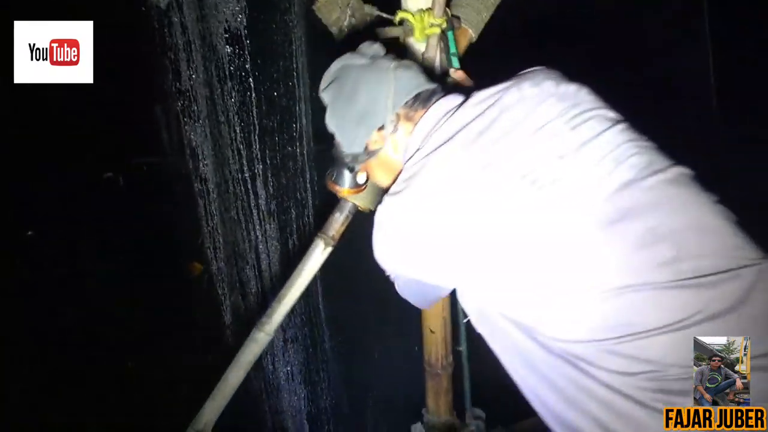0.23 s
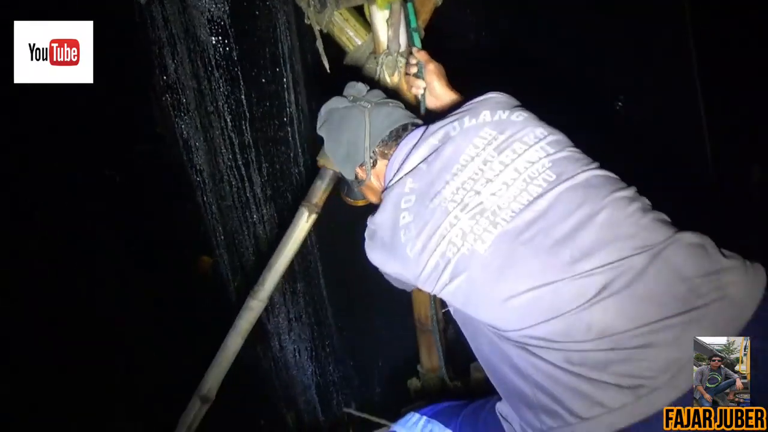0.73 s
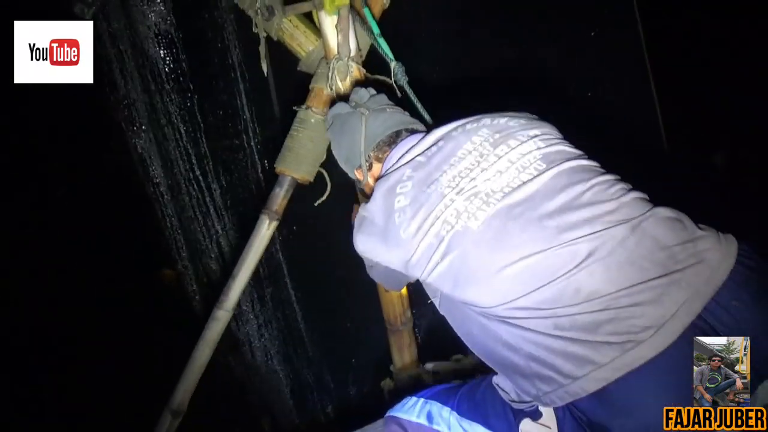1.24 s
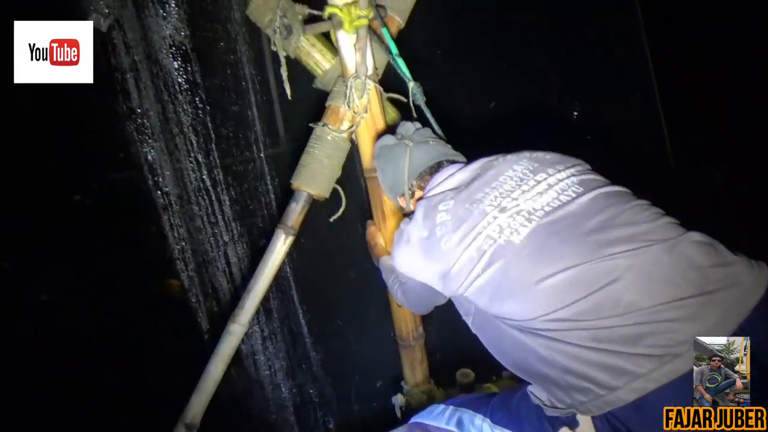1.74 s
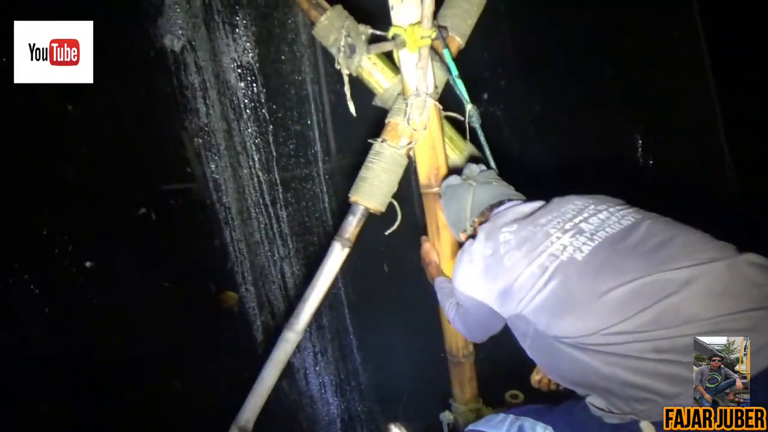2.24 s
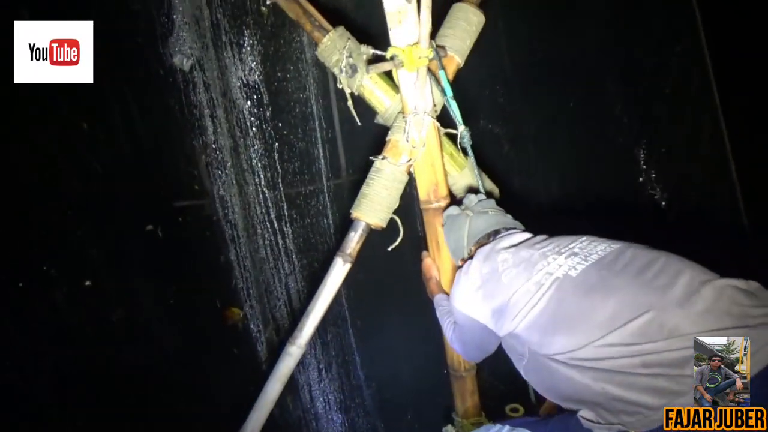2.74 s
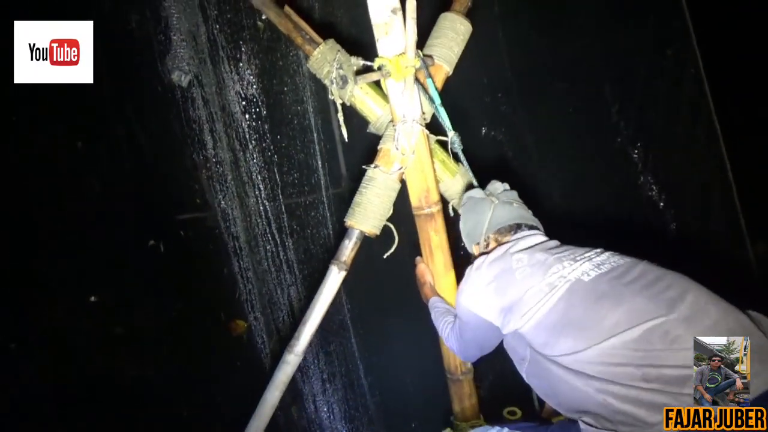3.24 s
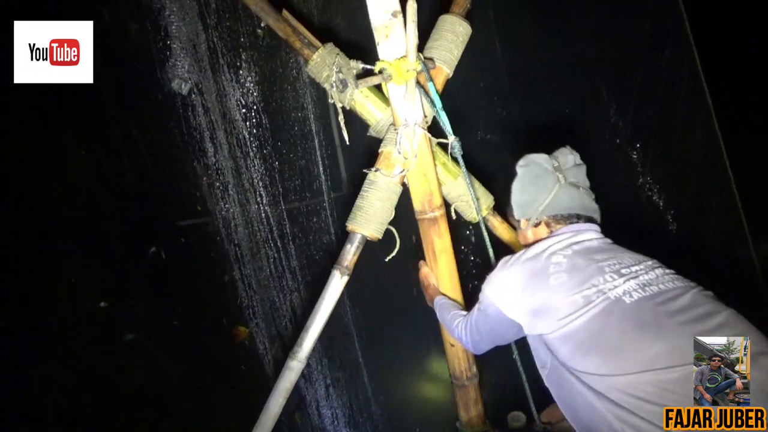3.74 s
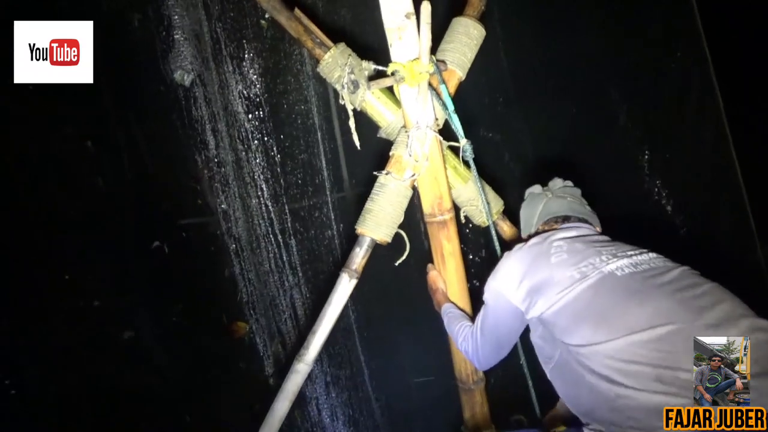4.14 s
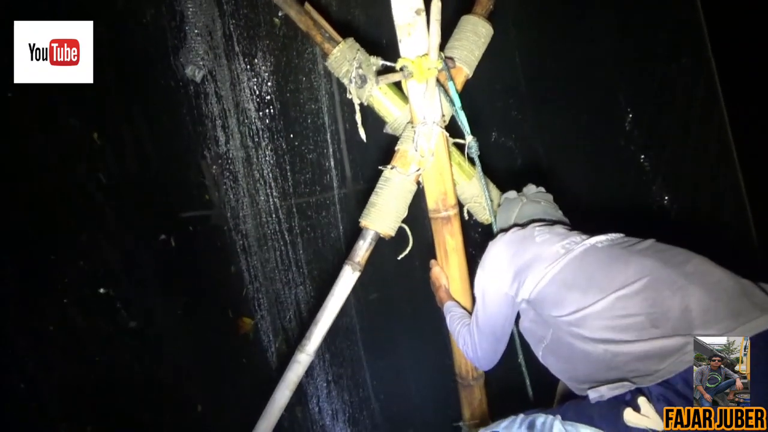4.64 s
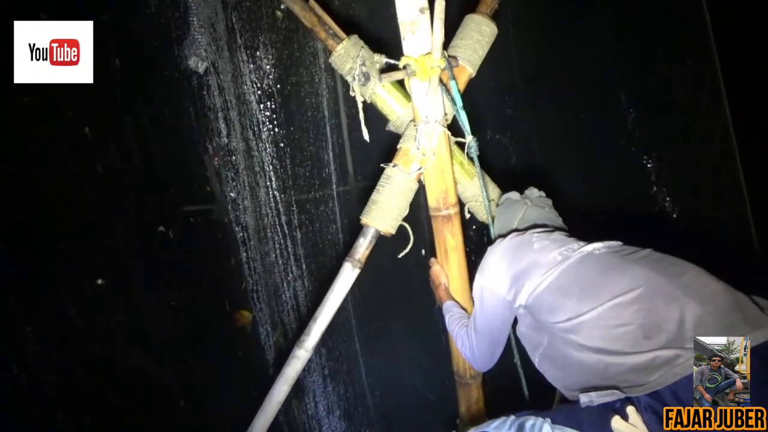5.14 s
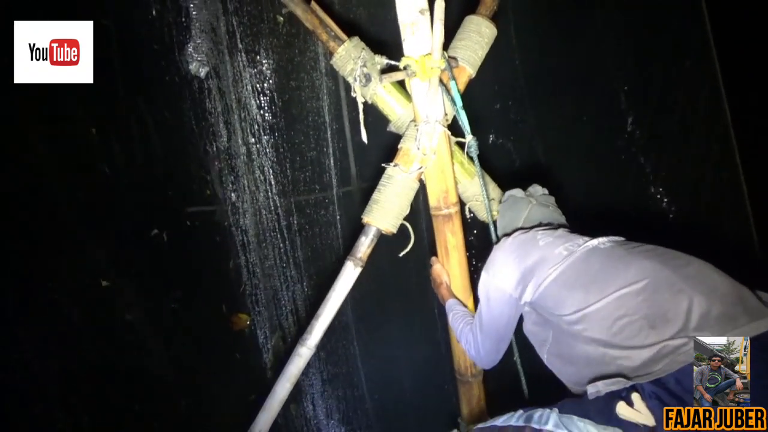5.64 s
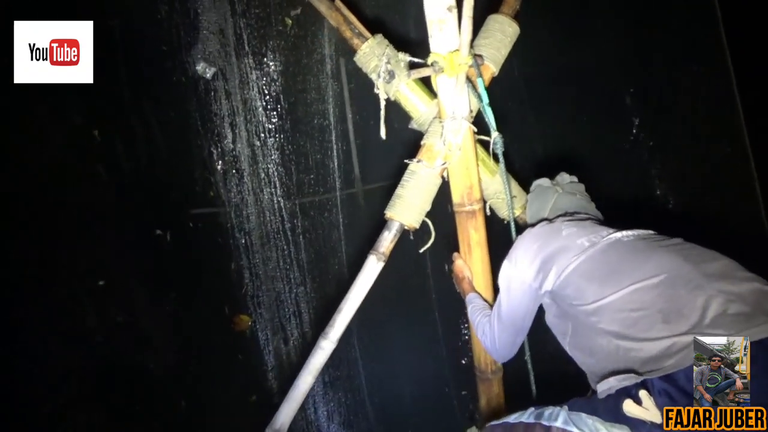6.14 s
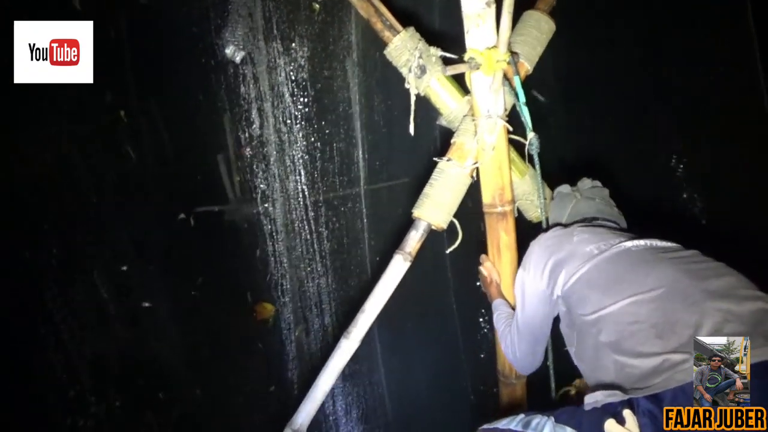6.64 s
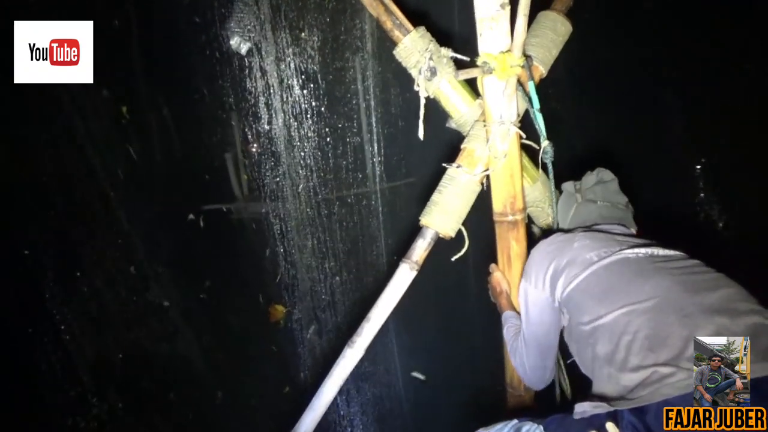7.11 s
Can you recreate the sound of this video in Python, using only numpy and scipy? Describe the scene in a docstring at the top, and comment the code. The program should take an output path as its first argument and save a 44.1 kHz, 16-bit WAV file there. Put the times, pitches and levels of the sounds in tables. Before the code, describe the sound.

Sharp drips, small plops and a few bamboo knocks sound over softly running river water and a faint, pulsing cricket.

```python
"""Lift net on a night river

Water rumbles, hushes and laps; a cricket rasps its wings near 5 kHz among far crickets and insects.
A wet net hangs from a bamboo frame: cloth and rope hiss by friction, knocks ring the modes of the poles,
and drops tick on the frame or plop into the river, where their bubbles resonate. The banks echo it all.
A mono sound is widened to pseudo-stereo: left and right channels alike in level, shifted in phase."""
import sys
import numpy as np
from scipy import signal
from scipy.fft import rfft, irfft, next_fast_len
from scipy.io import wavfile
from scipy.ndimage import uniform_filter1d, map_coordinates

SR = 44100
rng = np.random.default_rng(int(sys.argv[2]) if len(sys.argv) > 2 else 0)


def transcribe(signal):
    """Save signal, clipped to [-1, 1], as a 16-bit WAV file at the path in sys.argv[1]."""
    frames = np.atleast_2d(signal).T
    limited = np.clip(frames, -1, 1)
    pcm = np.round(limited * 32767).astype(np.int16)
    wavfile.write(sys.argv[1], SR, pcm)


N = 325149

# river rumble and ripples of water running off the net: (time [s], rumble level [dB], ripple level [dB])
WATER_LEVELS = [(0.0, -52, -44.5), (0.49, -52, -47), (1.05, -38.5, -51.5), (1.37, -52, -55),
                (1.82, -50.5, -55.5), (2.4, -54.5, -55), (3.2, -53.5, -57), (3.3, -53, -56.5),
                (6.3, -51, -58), (6.8, -43, -54.5), (7.1, -53, -53), (7.37, -54, -57.5)]
# noise spectra: (frequency [Hz], relative density [dB])
RUMBLE_SPECTRUM = [(12, -20), (25, 0), (40, -9), (59, 4.5), (97, -6), (200, -15), (260, -51)]
HUSH_SPECTRUM = [(71, -24), (120, -4), (225, -6.5), (308, -3.5), (470, -8.5), (844, -8.5), (1600, -17.5),
                 (2080, -21), (3520, -120)]
RIPPLE_SPECTRUM = [(900, -24), (1500, -5), (2600, -3), (4000, -6.5), (5000, -8), (6000, -33.5)]
TRICKLE_SPECTRUM = [(4000, -63), (5000, 1), (6500, -1.5), (9500, 2.5), (11000, -3.5), (13000, -8),
                    (16000, -12.5), (17000, -2)]
CLOTH_SPECTRUM = [(5000, -40), (7200, -38), (8300, -5), (9200, -6), (10000, -9), (11200, 1), (12800, -9),
                  (15000, -33)]
# share of the water noise that differs between the channels: (frequency [Hz], relative level [dB])
CHANNEL_DIFFERENCE = [(60, -28), (300, -7.5), (1500, -0.5), (5000, -10.5), (12000, -24.5)]
# pseudo-stereo all-pass filter, left channel minus right: (frequency [Hz], phase [rad])
ALLPASS_PHASE = [(30, .15), (70, 0.2), (140, 0.38), (300, 0.59), (700, 1), (1400, 1.6), (2400, 0.98),
                 (3500, 1.05), (5500, 0.38), (9000, 0.55), (12000, 0.071)]
# far insect choruses: (centre [Hz], half-width [Hz], level [dB], swell rate [1/s])
INSECT_BANDS = [(7940, 150, -67.5, 14), (5380, 300, -63, 20)]
# near cricket's phrases, single strokes then pairs: (start [s], first pair [s], pair period [s])
CRICKET_PHRASES = [(-.033, -.033, .1405), (.446, .619, .137), (1.683, 1.799, .1434), (2.772, 2.889, .1402),
                   (3.971, 4.146, .1386), (5.182, 5.361, .1407), (6.447, 6.76, .14)]
# strength of the near cricket: (time [s], level [dB])
CRICKET_LEVELS = [(0, -41), (.27, -46), (.38, -41), (.6, -41.5), (.9, -48), (1.5, -47), (2.1, -47),
                  (2.4, -51), (2.9, -45.5), (4.2, -47.5), (4.7, -53), (5.2, -50.5), (5.6, -51), (6.2, -48),
                  (7.37, -47)]
# rope slipping on bamboo: (time [s], duration [s], level [dB], centre [Hz], half-width [Hz])
ROPE_SLIPS = [(0, 0.058, -39.5, 8640, 3520), (0.239, 0.019, -41.5, 8540, 3500),
              (0.259, 0.034, -36, 6450, 5530), (0.254, 0.11, -35, 500, 950),
              (0.461, 0.025, -37, 7950, 4000), (2.119, 0.047, -42, 7700, 3420),
              (2.53, 0.084, -46, 9400, 2400), (2.889, 0.046, -48, 9300, 2400),
              (4.776, 0.031, -45, 6700, 5500), (5.012, 0.029, -33.5, 7900, 3770),
              (5.033, 0.017, -16.5, 8700, 2830), (5.031, 0.025, -25, 7340, 7350),
              (6.216, 0.04, -46.5, 7400, 4500), (6.65, 0.016, -42.5, 7200, 3040),
              (7.086, 0.023, -39.5, 7050, 4000)]
# modes of the poles: (frequency [Hz], relative level [dB], t60 at damping factor 1 [s])
BAMBOO_MODES = [(334, -1, 0.11), (419.8, -1.5, 0.11), (663.4, -8, 0.12), (843, 3, 0.042), (1017, -7, 0.089),
                (1214, -3, 0.064), (1472, -13.5, 0.13), (1900, -8, 0.12), (2070, -5, 0.045),
                (3750, -6, 0.013), (4540, 0, 0.038)]
# knocks of the poles: (time [s], level [dB], pitch [Hz], damping factor [1])
POLE_KNOCKS = [(.09, -24, 900, 1.8), (.258, -20.5, 776, 0.42), (.413, -18, 1390, 1.1),
               (.468, -5, 950, 0.97), (1.649, -19.5, 736, 2.4), (1.732, -26, 660, 0.81),
               (1.81, -26.5, 400, 5.3), (2.65, -21.5, 550, 0.75), (2.723, -21.5, 760, 0.74),
               (3.842, -35.5, 900, 0.66), (4.177, -33, 513, 1.7), (5.04, -18.5, 794, 3.5),
               (5.817, -37, 600, 1.1), (6.224, -26, 1700, 0.71), (6.515, -25, 1100, 1.16),
               (7.09, -16, 820, 0.72)]
# dull bumps through the frame: (time [s], relative level [dB], frequency [Hz])
FRAME_THUDS = [(.26, -21, 287), (.283, -18, 160), (0.298, -27, 120), (0.721, -26.5, 103),
               (1.225, -24.5, 71), (5.067, -18, 325), (5.072, -24.5, 252), (7.09, -18, 282)]
# drops into the water: (time [s], level [dB], splat centre [Hz], t60 [s])
DROP_PLOPS = [(.315, -30, 3300, 0.0097), (.6127, -29.5, 1780, 0.031), (1.355, -40, 840, .043),
              (1.421, -33.5, 1590, 0.037), (1.4553, -32, 1550, 0.025), (1.8442, -33.5, 2740, 0.01),
              (1.9102, -38, 2940, 0.028), (1.951, -39, 1176, 0.11), (2.0313, -33, 1715, 0.062),
              (2.0672, -33, 2270, 0.019), (2.305, -39.5, 2100, 0.023), (2.45, -32.5, 2360, 0.014),
              (2.496, -37, 1500, 0.031), (2.6125, -30.5, 3630, .015), (2.6299, -27.5, 3690, 0.023),
              (2.973, -38, 400, .05), (4.268, -43, 394, 0.028), (4.425, -35, 1290, 0.019),
              (4.7, -34, 810, 0.024), (5.563, -40.5, 603, 0.028), (5.988, -38, 740, .024),
              (6.577, -36, 2460, 0.01), (6.6757, -37, 3700, .015), (6.989, -41, 3360, .02)]
# drops on frame and net: (time [s], level [dB], ring frequency [Hz], t60 [s], relative body level [dB])
DROP_TICKS = [(0.0706, -31, 9600, .008, -25), (.181, -42, 8150, .006, -22), (0.2486, -23, 8200, .006, -23),
              (0.274, -27, 9250, 0.011, 3.5), (.384, -28, 9400, .006, -25), (0.405, -31, 5470, 0.0074, -6),
              (0.4125, -22, 7140, 0.0054, 5.5), (0.4687, -22, 8440, 0.0067, 10.5),
              (0.6248, -11, 9000, 0.0036, -39), (.7256, -33, 9100, .006, -14),
              (.8283, -30, 9200, .006, -62), (1.2133, -31, 7620, .009, -1), (1.736, -33, 9800, .006, -22),
              (1.9804, -37.5, 10600, 0.016, -26), (2.012, -35.5, 9100, .006, -11),
              (2.143, -26, 8340, 0.0065, -8), (2.2684, -34, 8930, .0055, -11),
              (2.3984, -7, 9320, 0.01, -20), (2.5238, -35, 9600, .005, -4),
              (2.6178, -25, 8650, 0.0091, -16), (2.63, -28.5, 8400, 0.0088, -7),
              (2.9504, -37.5, 9700, .006, 2), (3.0485, -27, 10140, 0.009, -12),
              (3.4212, -28, 7800, 0.0043, -7), (3.4526, -31.5, 7450, 0.0081, -14),
              (3.59, -43, 8350, 0.008, 5), (4.426, -35, 8300, 0.0084, 1), (4.7757, -33, 6110, .0045, -9),
              (4.786, -32.5, 10200, 0.01, -5.5), (4.8256, -36.5, 6200, .006, -25),
              (5.1296, -16.5, 9260, 0.003, -5.5), (6.114, -43, 8600, .006, -15),
              (6.2239, -29, 8300, .006, -1), (6.516, -30.5, 8500, 0.0053, 4),
              (6.8915, -33, 9000, 0.0045, -2), (7.0903, -30, 8100, .0055, -8), (7.2, -36, 9650, .0055, -4),
              (7.236, -25.5, 9200, 0.0032, -27)]


def amp(db):
    """Amplitude ratio of a level in decibels."""
    return 10 ** (np.asarray(db) / 20)


def unit(x):
    """Normalisation to an rms of 1."""
    return x / np.sqrt(np.mean(x ** 2) + 1e-20)


def along(points, hz):
    """Interpolation of (frequency, value) points on a logarithmic frequency axis."""
    freqs, values = np.transpose(points)
    return np.interp(np.log(hz + 1), np.log(freqs + 1), values)


def wobble(rate):
    """Slow random modulation: a spline through rate knots a second."""
    return map_coordinates(rng.standard_normal(int(N * rate / SR) + 4), [np.arange(N) * rate / SR])


def filtered(x, response):
    """Linear filtering: the spectrum of x times a complex frequency response."""
    size = next_fast_len(x.shape[-1] + 4096)
    return irfft(rfft(x, size) * response(np.fft.rfftfreq(size, 1 / SR)), size)[..., :x.shape[-1]]


def band(noise, hz, half_width_hz):
    """Band-limited noise of rms 1, flat-topped with steep sides."""
    return unit(filtered(noise, lambda f: np.exp(-((f - hz) / half_width_hz) ** 4)))


def add(out, start, sound):
    """Superposition of a sound from time start, in seconds."""
    part = out[max(round(start * SR), 0):][:len(sound)]
    part += sound[:len(part)]


def rush(spectrum, patchy_db, grain, drops_per_s):
    """Patchy noise plus droplet shot noise: a part common to both channels and a weaker difference."""
    cells = signal.stft(rng.standard_normal((2, N)), nperseg=512)[2]
    patches = uniform_filter1d(uniform_filter1d(rng.standard_normal(cells.shape[1:]), 6, 0), 12, 1)
    pair = signal.istft(cells * amp(patchy_db * unit(patches)), nperseg=512)[1][:, :N]
    impulses = (rng.random(N) < drops_per_s / SR) * np.sign(rng.standard_normal(N))
    pair[0] += grain * unit(impulses * amp(14 * rng.random(N)))
    pair = filtered(pair, lambda hz: amp(along(spectrum, hz) + [0 * hz, along(CHANNEL_DIFFERENCE, hz)]))
    return pair / pair[0].std()


def water():
    """Modulated flow noise: over a rumble, the river's hush and the net's trickle follow the ripples."""
    times, *levels = np.transpose(WATER_LEVELS)
    rumble_db, ripple_db = [np.interp(np.arange(N) / SR, times, level) for level in levels]
    flow_db = ripple_db - ripple_db.mean()
    hush_db, trickle_db = -48 + .75 * flow_db, -52.5 + .68 * flow_db
    rumble = amp(rumble_db + 1.3 * wobble(12)) * rush(RUMBLE_SPECTRUM, .8, grain=.01, drops_per_s=30)
    hush = amp(hush_db + .8 * wobble(10)) * rush(HUSH_SPECTRUM, 1, grain=.11, drops_per_s=34)
    ripple = amp(ripple_db + .72 * wobble(10)) * rush(RIPPLE_SPECTRUM, 2, grain=.16, drops_per_s=63)
    trickle = amp(trickle_db + wobble(14)) * rush(TRICKLE_SPECTRUM, 1.9, grain=.22, drops_per_s=23)
    return rumble + hush + ripple + trickle


def bank_echoes(x, t60=.11):
    """Diffuse reverberation: scattering from water, poles and banks, with its own tail in each channel."""
    t = np.arange(SR // 6) / SR
    tail = rng.standard_normal((2, len(t))) * amp(-60 * t / t60) * (t > .002)
    return signal.fftconvolve(x[None], tail / np.linalg.norm(tail[0]), axes=1)[:, :N]


def laps(count):
    """Damped resonance: bubbles from wavelets and far drops rise in pitch and die in a few cycles."""
    out, t = np.zeros(N), np.arange(SR // 20) / SR
    for when, pitch, loud in rng.random((count, 3)):
        hz = 300 * 6 ** pitch
        envelope = amp(-52.5 + 20 * loud ** 2 - 3.8 * hz * t) * (1 - np.exp(-hz * t))
        add(out, when * N / SR, envelope * np.sin(2 * np.pi * hz * t * (1 + 5 * t)))
    return out


def far_insects():
    """Incoherent summation: many distant calls blur into swelling bands of noise."""
    return sum(amp(db + 2.3 * wobble(rate)) * band(rng.standard_normal(N), hz, half_width_hz)
               for hz, half_width_hz, db, rate in INSECT_BANDS)


def wing_strokes(single_period_s=.058, pair_gap_s=.037):
    """Pulse train of the near cricket, (time [s], level [dB]); a pair's first stroke is the weaker."""
    strokes = []
    stops = [phrase[0] for phrase in CRICKET_PHRASES[1:]] + [N / SR]
    for (start, first_pair, period), stop in zip(CRICKET_PHRASES, stops):
        singles = np.arange(start, first_pair - pair_gap_s, single_period_s)
        firsts = np.arange(first_pair, stop - pair_gap_s, period)
        seconds = firsts[firsts + 2 * pair_gap_s < stop] + pair_gap_s
        strokes += [(s, -1.5) for s in firsts] + [(s, 0) for s in np.append(singles, seconds)]
    return [(s, db + np.interp(s, *np.transpose(CRICKET_LEVELS))) for s, db in strokes if s > 0]


def crickets(stroke_s=.032):
    """Stridulation: each wing stroke, near or far, swells as its pitch falls, then stops short."""
    out = np.zeros(N)
    u = np.arange(round(stroke_s * SR)) / SR / stroke_s  # progress through the stroke
    swell = .41 * np.sin(np.pi * u) ** .54 + .66 * np.sin(np.pi * u ** 2.46) ** 2
    near = [(s, db, 5490, 350) for s, db in wing_strokes()]
    far = [(s + .011 * late, -60 + .5 * s + 2.7 * loud, 5790 + 70 * detune, 220)
           for s, (late, loud, detune) in zip(np.arange(0, N / SR, .045), rng.standard_normal((170, 3)))]
    for (s, db, hz, fall_hz), (detune, late, loud) in zip(far + near, rng.standard_normal((300, 3))):
        pitch_hz = hz + 40 * detune - fall_hz * u ** 1.27
        tone = np.sin(2 * np.pi * np.cumsum(pitch_hz) / SR)
        # uneven wing teeth roughen the tone
        rasp = 1 + .3 * np.sin(2 * np.pi * (3 * u + late)) + .3 * np.sin(2 * np.pi * (7.3 * u + detune))
        add(out, s + .002 * late - .7 * stroke_s, amp(db + 1.3 * loud) * swell * rasp * tone)
    return out


def cloth_slide(start_s=.7, rise_s=.12, sag_s=.46, fall_s=.064):
    """Sliding friction: cloth gives one soft hiss that rises, sags and stops."""
    corners = np.cumsum([start_s, rise_s, sag_s, fall_s])
    envelope = np.interp(np.arange(N) / SR, corners, [0, 1, amp(-9.5), 0])
    hiss = unit(filtered(rng.standard_normal(N), lambda hz: amp(along(CLOTH_SPECTRUM, hz))))
    return amp(-44.5) * envelope * hiss


def rope_slips():
    """Friction in short slips: rope on bamboo gives gritty puffs of noise."""
    out, t = np.zeros(N), np.arange(SR // 8) / SR
    shape = len(ROPE_SLIPS), len(t)
    grit = rng.standard_normal(shape) * amp(8.6 * rng.standard_normal(shape))
    for (start, duration, db, hz, half_width_hz), noise in zip(ROPE_SLIPS, grit):
        envelope = np.sin(np.pi * np.clip(t / duration, 0, 1)) ** .65
        add(out, start, amp(db) * envelope * band(noise, hz, half_width_hz))
    return out


def poles(reach_octaves=1.074):
    """Modal vibration: rattling contacts ring the modes near a knock's pitch; a thud is one low push."""
    out, t = np.zeros(N), np.arange(SR // 5) / SR
    for (start, db, pitch_hz, damping), scatter in zip(
            POLE_KNOCKS, rng.standard_normal((len(POLE_KNOCKS), len(BAMBOO_MODES), 2))):
        # where the pole is struck picks its modes
        weight_db = lambda f: -6 * (np.log2((f + 1) / pitch_hz) / reach_octaves) ** 2
        modes = sum(amp(level + weight_db(hz) + 2 * loud - 60 * t * damping / t60)
                    * np.sin(2 * np.pi * hz * (1 + .015 * detune) * t)
                    for (hz, level, t60), (loud, detune) in zip(BAMBOO_MODES, scatter))
        noise = rng.standard_normal(len(t))
        contacts = noise * amp(-60 * t / .014)
        contacts[0] = 28  # the first blow
        ring = signal.fftconvolve(modes, contacts)[:len(t)]
        rattle = unit(filtered(noise, lambda f: amp(weight_db(f)) / (1 + (300 / (f + 1)) ** 4)))
        rattle *= .45 * amp(-60 * t * damping / .06)
        attack = 1 - np.exp(-t / .00056)
        add(out, start, amp(db) * attack * (ring / np.abs(ring).max() + rattle))
    for start, db, hz in FRAME_THUDS:
        envelope = hz * t * np.exp(-2.2 * hz * t)
        add(out, start, -amp(db + 10) * envelope * np.sin(2 * np.pi * hz * t))
    return out


def plops(rise_hz_per_s=12200):
    """Bubble resonance: inside a drop's wet splat, a tone climbs as the bubble nears the surface."""
    out, t = np.zeros(N), np.arange(SR // 16) / SR
    for start, db, hz, t60 in DROP_PLOPS:
        envelope = amp(-60 * t / t60) * (1 - np.exp(-t / .00062))
        bubble = np.sin(2 * np.pi * t * (.95 * hz + .5 * rise_hz_per_s * t))
        splat = .75 * amp(-60 * t / .25) * band(rng.standard_normal(len(t)), hz, .71 * hz)
        add(out, start, amp(db) * envelope * (bubble + splat))
    return out


def ticks(faint_count):
    """Impact excitation: a drop gives a brief high ring and a wide snap; faint ones fall at random."""
    out, t = np.zeros(N), np.arange(SR // 16) / SR
    faint = [(when * N / SR, -39 + 3 * loud, 8530 * (.8 + .4 * pitch), .0087, -25 * thin)
             for when, loud, pitch, thin in rng.random((faint_count, 4))]
    for start, db, hz, t60, body_db in DROP_TICKS + faint:
        noise = rng.standard_normal(len(t))
        envelope = amp(-60 * t / t60) * (1 - np.exp(-t / .000081))
        ring = 1.3 * np.sin(2 * np.pi * hz * t)
        snap = .63 * band(noise, 9300, 2640) + 1.7 * amp(-60 * t / .00062) * band(noise, 8600, 5100)
        body = amp(body_db) * band(noise, 3260, 1500)
        add(out, start, amp(db) * envelope * (ring + snap + body))
    return out


def scene():
    """Direct and reverberant sound over the water: the insects, being farther off, echo more."""
    common, difference = water()
    near = cloth_slide() + rope_slips() + ticks(faint_count=22) + plops() + poles() + laps(count=160)
    singers = crickets() + far_insects()
    echoes = bank_echoes(amp(-19) * near + amp(-3.5) * singers)
    return common + near + singers + [difference, -difference] + echoes


def record(dry, top_hz=15900):
    """Pseudo-stereo: an all-pass filter shifts the channels' phases oppositely; top_hz ends the band."""
    return filtered(dry, lambda hz: np.exp(.5j * np.outer([1, -1], along(ALLPASS_PHASE, hz)))
                    * (hz < top_hz))


dry = scene()
out = record(dry)
transcribe(out)
```